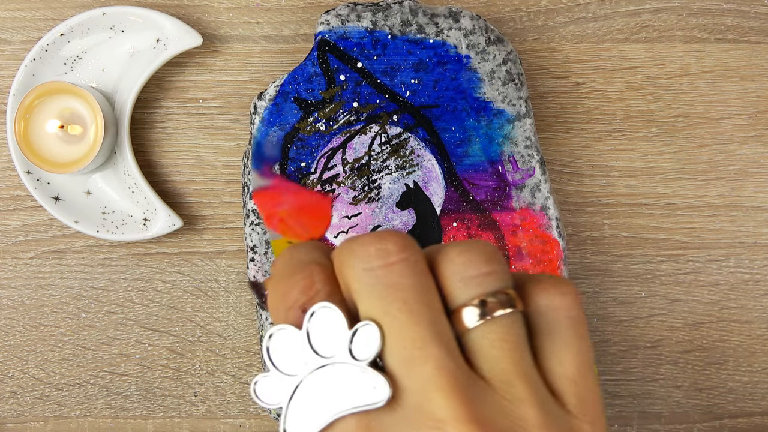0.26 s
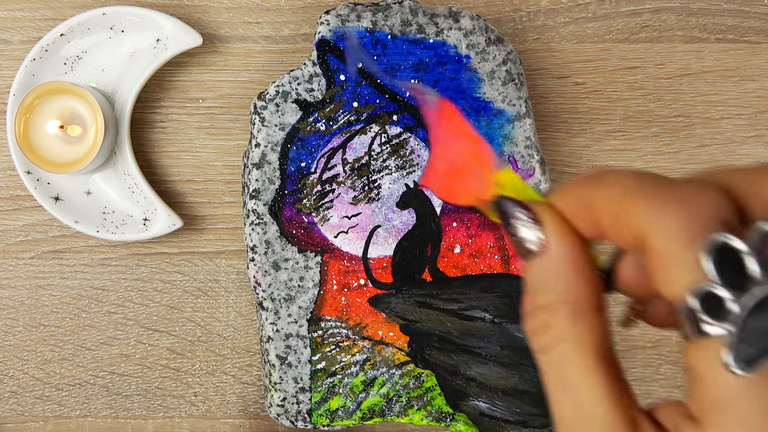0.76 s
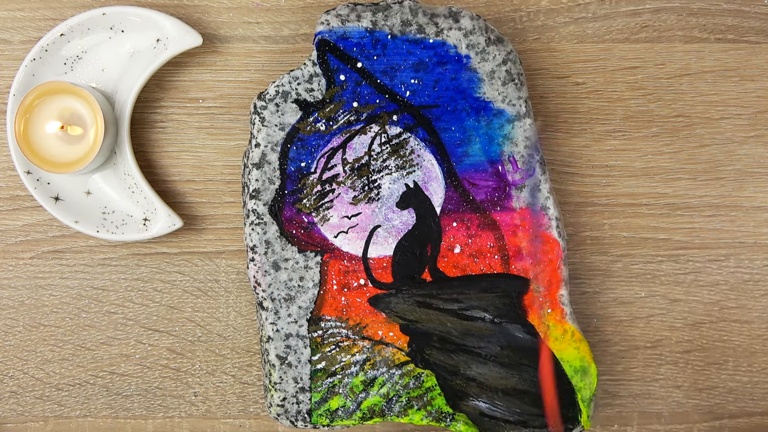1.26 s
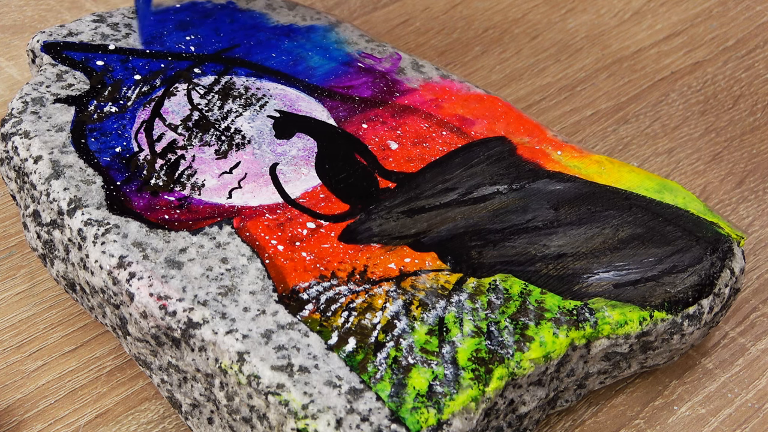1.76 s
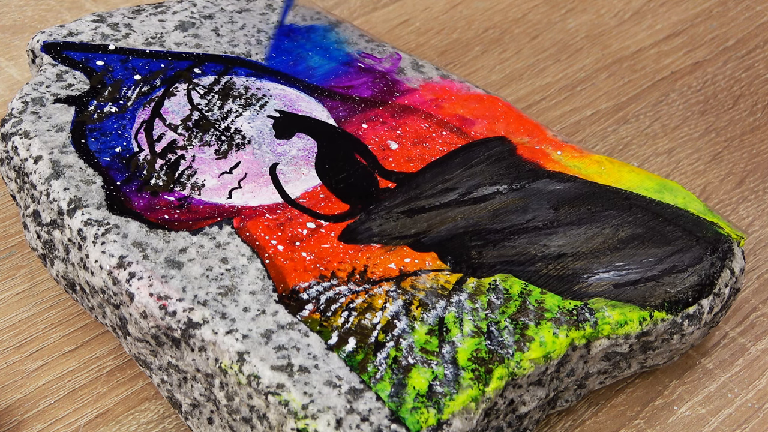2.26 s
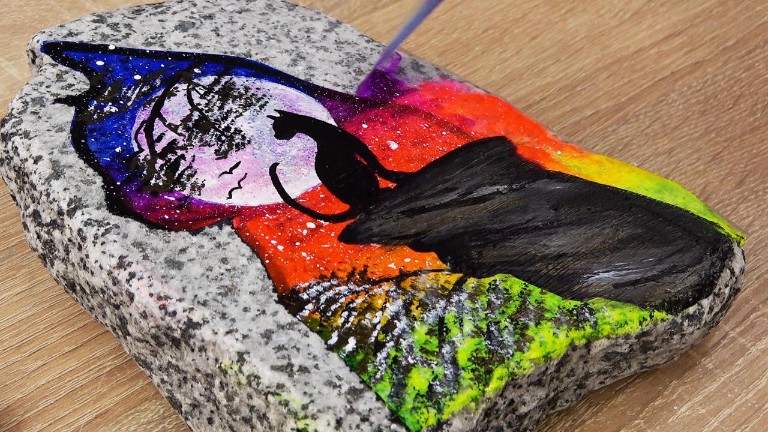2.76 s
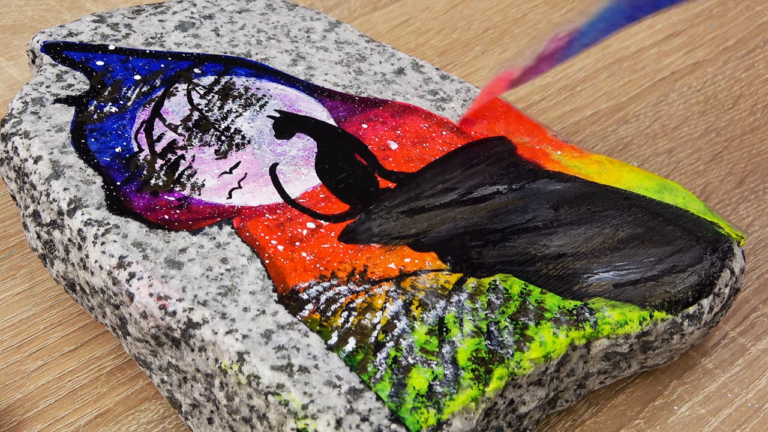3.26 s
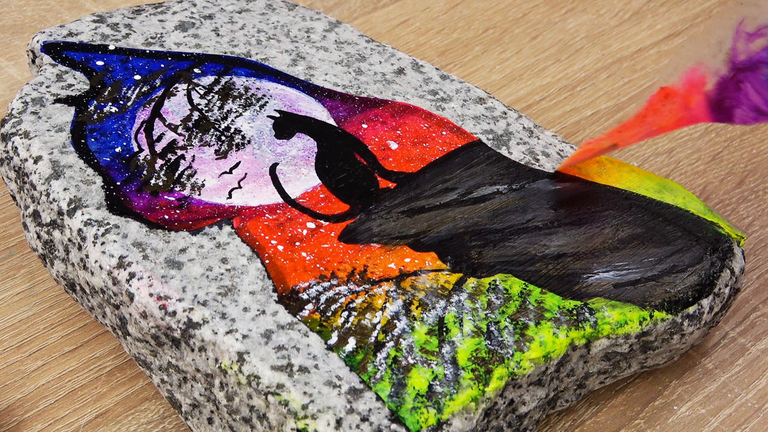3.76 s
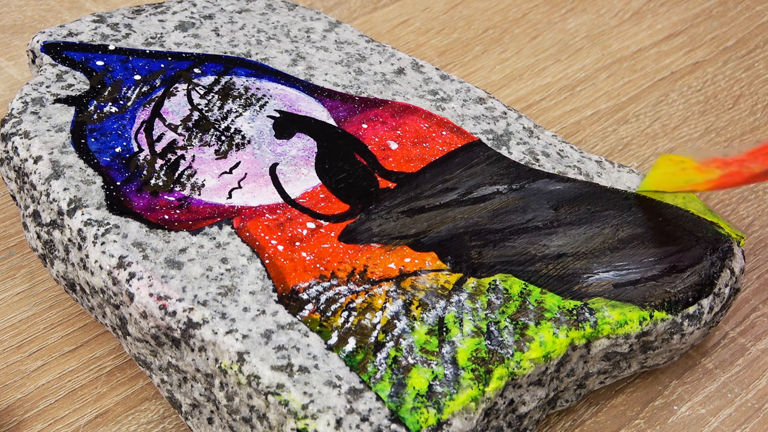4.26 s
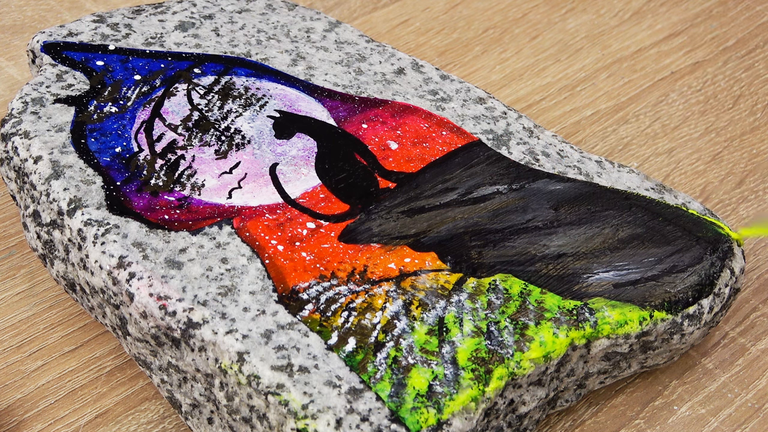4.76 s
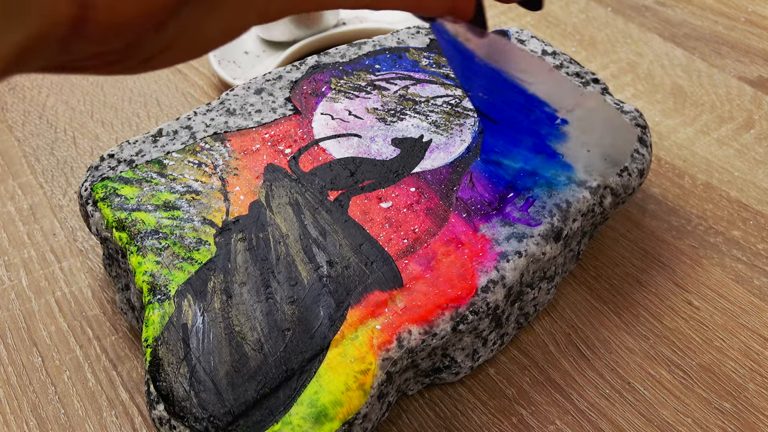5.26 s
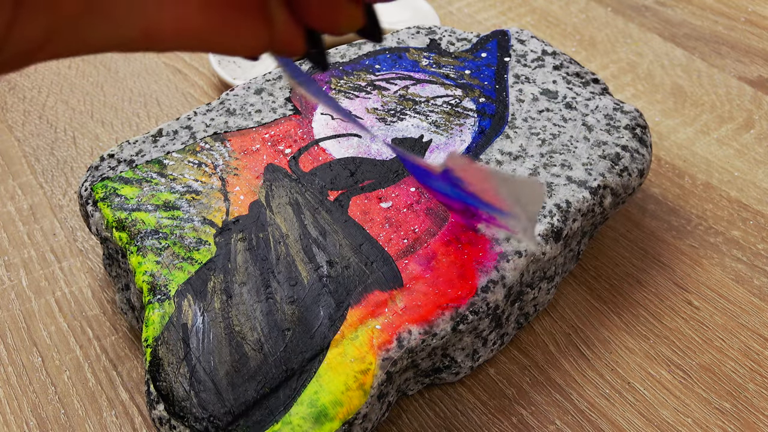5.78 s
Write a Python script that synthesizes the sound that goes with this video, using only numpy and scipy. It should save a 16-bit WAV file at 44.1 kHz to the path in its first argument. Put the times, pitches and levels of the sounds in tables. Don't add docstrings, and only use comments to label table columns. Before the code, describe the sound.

Dry sticky tearing: dense crisp snaps and fine crackle as stiff painted tape is pulled from stone, with quiet gaps between pulls.

```python
import sys
import numpy as np
from scipy import signal
from scipy.fft import rfft, irfft, next_fast_len
from scipy.io import wavfile
from scipy.ndimage import map_coordinates

SR = 44100
rng = np.random.default_rng(int(sys.argv[2]) if len(sys.argv) > 2 else 0)


def transcribe(u):
    v = np.clip(np.atleast_2d(u).T, -1, 1)
    q = np.round(v * 32767).astype(np.int16)
    wavfile.write(sys.argv[1], SR, q)


def decibels_to_gain(level_db):
    exponent = np.asarray(level_db, float) / 20
    return 10 ** exponent


N = 265482

# t/s, wide crack peak level/dB, strongest f/Hz, thin
# cracks level/dB, strip knock level/dB
GLUE_SNAPS = [(0.1953, -17.0, 4500.0, -17.0, -29.0), (0.2121, -3.0, 6400.0, -2.0, -16.0),
              (0.2161, -8.0, 3900.0, -1.0, -47.0), (0.2204, -6.0, 5000.0, -5.0, -23.0),
              (0.2273, -7.0, 3900.0, 1.0, -23.0), (0.238, -15.0, 6400.0, -4.0, -27.0),
              (0.2424, -13.0, 5300.0, -4.0, -25.0), (0.2458, -20.0, 1200.0, -4.0, -26.0),
              (0.2502, -23.0, 5500.0, -4.0, -30.0), (0.254, -24.0, 1100.0, -4.0, -25.0),
              (0.2594, -17.0, 3600.0, -7.0, -27.0), (0.2622, -14.0, 6900.0, -7.0, -23.0),
              (0.2685, -5.0, 7000.0, -4.0, -25.0), (0.2712, -4.0, 5100.0, -2.0, -21.0),
              (0.2771, -9.0, 7000.0, 0.0, -17.0), (0.2819, -5.0, 6900.0, -2.0, -14.0),
              (0.2846, -9.0, 2700.0, -7.0, -33.0), (0.2888, -7.0, 6700.0, -7.0, -21.0),
              (0.2926, -6.0, 6500.0, -6.0, -24.0), (0.2964, -7.0, 4200.0, -7.0, -21.0),
              (0.2988, -13.0, 4700.0, -6.0, -17.0), (0.3012, -9.0, 6400.0, -7.0, -25.0),
              (0.3052, -8.0, 6400.0, -2.0, -19.0), (0.3108, -4.0, 4900.0, -3.0, -18.0),
              (0.3181, -15.0, 6900.0, -6.0, -27.0), (0.3227, -13.0, 7000.0, -4.0, -23.0),
              (0.3312, -16.0, 1800.0, -7.0, -20.0), (0.335, -12.0, 7000.0, -6.0, -21.0),
              (0.3385, -21.0, 1900.0, -7.0, -30.0),
              (0.5922, -27, 7000.0, -13, -32), (0.6007, -21, 5900.0, -9, -31),
             (0.6144, -17, 3600.0, -14, -25), (0.625, -15, 5700.0, -16, -28),
             (0.6308, -16, 5900.0, -10, -29), (0.6341, -10, 3400.0, -5, -20),
             (0.6388, -11, 3800.0, -8, -20), (0.645, -6, 1800.0, -6, -11), (0.6532, -14, 2500.0, -7, -24),
             (0.6563, -11, 2400.0, -3, -26), (0.6607, -19, 2000.0, -7, -22), (0.6658, -17, 1800.0, -7, -20),
             (0.6698, -15, 5400.0, 2, -35), (0.68, -11, 7000.0, -1, -23), (0.685, -19, 5300.0, -12, -31),
             (0.6933, -18, 7000.0, -7, -32), (0.7053, -7, 1400.0, -2, -11), (0.7218, -19, 1700.0, -14, -23),
             (0.7262, -16, 1300, -15, -15), (0.7424, -16, 6400.0, -10, -31), (0.7774, -15, 2200.0, -14, -9),
             (0.7841, -10, 2900.0, -11, -24), (0.7975, -17, 6500.0, -14, -43),
             (0.811, -9, 3800.0, -14, -23), (0.8339, -14, 1600.0, -9, -11), (0.8509, -20, 2300.0, -25, -21),
             (0.882, -13, 6400.0, -1, -16), (0.893, -15, 2300.0, -13, -22), (0.9086, -30, 2000.0, -14, -24),
             (0.9595, -13, 6400.0, -7, -20), (0.9687, -17, 1100.0, -11, -18), (1.0016, -7, 1900.0, 1, -11),
             (1.0114, -8, 1600.0, -9, -9),
              (1.4202, -32, 1700.0, -18, -27), (1.4325, -32, 1250, -26, -25),
              (1.458, -25, 7000.0, -17, -28), (1.4847, -26, 1200.0, -15, -22),
              (1.5125, -6, 3900.0, -2, -17), (1.5937, -20, 3500.0, -21, -35),
              (1.6171, -26, 5200.0, -17, -36), (1.6213, -22, 7000.0, -14, -35),
              (1.6251, -14, 3300.0, -6, -27), (1.647, -18, 1900.0, -12, -18),
              (1.665, -13, 6500.0, -16, -26), (1.6703, -20, 1300, -16, -19),
              (1.6788, -15, 6100.0, -13, -25), (1.6814, -16, 6400.0, -15, -26),
              (1.6899, -16, 3400.0, -21, -30), (1.704, -18, 6600.0, -14, -27),
              (1.7846, -16, 6700.0, -9, -28), (1.8056, -8, 5700.0, -3, -22), (1.8131, -15, 3300.0, -7, -30),
              (1.8245, -10, 3200.0, -7, -36), (1.829, -7, 3200.0, -3, -31), (1.8519, -11, 6200.0, -3, -29),
              (1.8684, -14, 2900.0, -11, -27), (1.8797, -17, 2800.0, -12, -33),
              (1.8854, -14, 7000.0, -7, -27), (1.8946, -13, 5600.0, -11, -21),
              (1.9009, -11, 7000.0, -4, -20), (1.9199, -13, 3200.0, -16, -25),
              (1.9236, -16, 7000.0, -7, -44), (1.9298, -15, 5600.0, -13, -25),
              (1.9655, -15, 2900.0, -11, -22), (1.9693, -16, 5300.0, -18, -39),
              (1.9976, -19, 7000.0, -18, -27), (2.0014, -15, 5300.0, -14, -42),
              (2.0188, -9, 2900.0, -9, -22), (2.0247, -8, 2800.0, -9, -14), (2.0295, -12, 3000.0, -11, -44),
              (2.0836, -11.0, 6400.0, -5.0, -25.0), (2.1233, -8.0, 3700.0, 0.0, -17.0),
              (2.2173, -11.0, 3600.0, -13.0, -33.0), (2.245, -13.0, 2900.0, -11.0, -31.0),
              (2.2635, -16.0, 6800.0, -9.0, -24.0), (2.2676, -9.0, 5700.0, -12.0, -59.0),
              (2.2785, -15.0, 4200.0, -5.0, -29.0), (2.2838, -14.0, 4500.0, -9.0, -29.0),
              (2.2965, -4.0, 7000.0, -4.0, -20.0), (2.3078, -12.0, 7000.0, -11.0, -32.0),
              (2.3256, -10.0, 6500.0, -3.0, -23.0), (2.3415, -11.0, 5800.0, -8.0, -25.0),
              (2.357, -4.0, 5200.0, -6.0, -22.0), (2.3702, -9.0, 4400.0, -7.0, -23.0),
              (2.3761, -7.0, 6600.0, -6.0, -24.0), (2.3894, -11.0, 6700.0, -4.0, -21.0),
              (2.3931, -9.0, 7000.0, -2.0, -24.0), (2.3972, -9.0, 6100.0, -8.0, -25.0),
              (2.4223, -2.0, 5300.0, -2.0, -21.0), (2.4351, -4.0, 5400.0, -6.0, -16.0),
              (2.4384, -10.0, 6600.0, -9.0, -33.0), (2.4556, -6.0, 4200.0, -6.0, -23.0),
              (2.4796, -6.0, 6500.0, -3.0, -27.0), (2.5015, -7.0, 4900.0, -3.0, -26.0),
              (2.509, -9.0, 6100.0, -13.0, -25.0), (2.514, -8.0, 6600.0, -1.0, -26.0),
              (2.5185, -3.0, 6000.0, -4.0, -17.0), (2.559, -3.0, 6100.0, -3.0, -16.0),
              (2.5808, -15.0, 6000.0, -9.0, -31.0), (2.5966, -10.0, 4900.0, -8.0, -29.0),
              (2.6417, -11.0, 2300.0, -5.0, -13.0), (2.6648, -3.0, 6100.0, -5.0, -21.0),
              (2.6782, -6.0, 5400.0, -5.0, -19.0), (2.6807, -5.0, 5300.0, -6.0, -16.0),
              (2.6879, -5.0, 6200.0, -2.0, -18.0), (2.6933, -3.0, 6300.0, -2.0, -22.0),
              (2.7016, -2.0, 6100.0, -8.0, -15.0), (2.7106, -10.0, 7000.0, -3.0, -19.0),
              (2.7277, -3.0, 6100.0, -6.0, -20.0), (2.7364, -7.0, 4700.0, -4.0, -16.0),
              (2.7627, -5.0, 6200.0, -7.0, -22.0), (2.766, -4.0, 6800.0, 0.0, -18.0),
              (2.7776, -6.0, 4000.0, -4.0, -17.0), (2.8086, -2.0, 5000.0, -6.0, -19.0),
              (2.8235, -7.0, 4100.0, -10.0, -20.0), (2.8383, -5.0, 5200.0, -9.0, -20.0),
              (2.8708, -1.0, 6300.0, -6.0, -24.0), (2.8815, -6.0, 4000.0, -14.0, -18.0),
              (2.8861, -6.0, 5700.0, -6.0, -26.0), (2.9126, -10.0, 5600.0, -3.0, -26.0),
              (2.921, -4.0, 4700.0, -5.0, -22.0), (2.9266, -4.0, 4700.0, -4.0, -20.0),
              (2.9519, -4.0, 5000.0, -3.0, -23.0), (2.9621, -2.0, 5700.0, -6.0, -26.0),
              (2.9726, -6.0, 6300.0, -3.0, -16.0), (2.9971, -4.0, 3900.0, -3.0, -15.0),
              (3.0041, -1.0, 5700.0, -5.0, -18.0), (3.0196, -3.0, 5400.0, -3.0, -16.0),
              (3.0326, -7.0, 2400.0, -2.0, -14.0), (3.051, -11.0, 5200.0, -5.0, -32.0),
              (3.0706, -4.0, 5300.0, -4.0, -17.0), (3.0755, -5.0, 6400.0, -2.0, -24.0),
              (3.0852, -6.0, 5200.0, -9.0, -13.0), (3.114, -9.0, 7000.0, -2.0, -16.0),
              (3.1659, -10.0, 6300.0, -8.0, -24.0), (3.1739, -7.0, 5700.0, -6.0, -21.0),
              (3.1769, -10.0, 5300.0, -2.0, -24.0), (3.2109, -13.0, 5800.0, -6.0, -27.0),
              (3.2204, -8.0, 2900.0, -4.0, -22.0), (3.2325, -4.0, 5900.0, -3.0, -21.0),
              (3.2833, -5.0, 6700.0, -2.0, -23.0), (3.2941, -4.0, 5900.0, -4.0, -19.0),
              (3.3168, -16.0, 6000.0, -8.0, -27.0), (3.3412, -6.0, 5300.0, -3.0, -24.0),
              (3.359, -12.0, 7000.0, -4.0, -23.0), (3.3735, -7.0, 5400.0, -4.0, -17.0),
              (3.4004, -10.0, 7000.0, -5.0, -24.0), (3.4311, -4.0, 5500.0, -3.0, -19.0),
              (3.4385, -8.0, 6800.0, -4.0, -23.0), (3.4531, -6.0, 5500.0, -2.0, -23.0),
              (3.4634, -10.0, 7000.0, -2.0, -25.0), (3.4667, -16.0, 7000.0, 0.0, -49.0),
              (3.5022, -5.0, 6800.0, -3.0, -18.0), (3.5059, -12.0, 5200.0, -7.0, -19.0),
              (3.532, -7.0, 6700.0, -2.0, -16.0), (3.5468, -12.0, 3300.0, -3.0, -21.0),
              (3.5609, -6.0, 5400.0, -8.0, -27.0), (3.578, -3.0, 6700.0, 0.0, -16.0),
              (3.5901, -8.0, 5300.0, -6.0, -21.0), (3.5954, -14.0, 7000.0, -2.0, -27.0),
              (3.6207, -11.0, 5300.0, -8.0, -23.0), (3.6315, -11.0, 6700.0, -4.0, -25.0),
              (3.6569, -9.0, 6300.0, -2.0, -18.0), (3.6779, -13.0, 5800.0, -8.0, -41.0),
              (3.6859, -7.0, 6800.0, -1.0, -19.0), (3.7078, -7.0, 5300.0, -11.0, -22.0),
              (3.7361, -27, 3900.0, -26, -34), (3.7916, -30, 6700.0, -22, -46),
             (3.796, -21, 3100.0, -24, -36), (3.8379, -7, 6500.0, -2, -24), (3.8423, -26, 6700.0, -18, -47),
             (3.9532, -29, 4700.0, -24, -47), (3.9715, -24, 7000.0, -15, -38),
             (3.9763, -24, 3600.0, -22, -39), (4.0046, -21, 5500.0, -16, -39),
             (4.016, -24, 7000.0, -16, -41), (4.0358, -22, 3300.0, -18, -33), (4.0527, -16, 950, -11, -24),
             (4.0742, -21, 5400.0, -29, -32), (4.0873, -23, 4900.0, -18, -36),
             (4.2365, -48, 6900.0, -32, -52), (4.2585, -28, 2900.0, -40, -37),
             (4.2659, -18, 3000.0, -24, -32), (4.3144, -27, 950, -17, -30), (4.3278, -25, 7000.0, -10, -42),
             (4.3508, -19, 2900.0, -21, -35), (4.3678, -37, 2500.0, -29, -50),
             (4.3945, -19, 2500.0, -20, -29), (4.4022, -18, 7000.0, -10, -37),
             (4.4215, -25, 3100.0, -34, -31), (4.4518, -22, 3000.0, -30, -32),
             (4.4669, -23, 3100.0, -31, -34), (4.551, -26, 3000.0, -52, -43),
             (4.5834, -29, 3100.0, -30, -35), (4.8276, -26, 2900.0, -36, -33),
             (4.8324, -22, 5400.0, -23, -36), (4.8758, -28, 3600.0, -37, -50)]
# t/s, peak level/dB
LESSER_SNAPS = [(0.2233, -7), (0.2307, -6), (0.2648, -6), (0.3498, -10), (0.3547, -7), (2.1, -11),
                (2.1653, -8), (2.1793, -10), (2.194, -9), (2.2515, -9), (2.2546, -8), (2.261, -8),
                (2.2935, -7), (2.3628, -8), (2.3856, -6), (2.4006, -9), (2.4299, -7), (2.499, -8),
                (2.6258, -3), (2.6687, -4), (2.7202, -5), (2.7307, -5), (2.7449, -5), (2.7468, -5),
                (2.7545, -7), (2.7606, -7), (2.7964, -6), (2.8281, -4), (2.8302, -4), (2.8335, -3),
                (2.8631, -8), (2.8684, -6), (2.898, -4), (2.9006, -4), (2.9365, -5), (3.0163, -7),
                (3.0414, -8), (3.1405, -10), (3.1549, -8), (3.2061, -6), (3.2655, -10), (3.2741, -6),
                (3.2873, -5), (3.3694, -4), (3.3906, -5), (3.4082, -8), (3.4232, -6), (3.5991, -6),
                (3.6924, -7)]
# t/s, peak level/dB
JOLTS = [(0.282, -29), (0.334, -21.5), (0.643, -29), (0.705, -26), (0.726, -29.5), (1.011, -26),
         (2.122, -24.5), (2.162, -32), (2.434, -31), (3.232, -21.5), (3.53, -19.5), (3.837, -42),
         (4.051, -49), (4.265, -39), (4.314, -36)]
# start of full force t/s, held/s, rise/s, fine crackle level/dB, flap level/dB
PULLS = [(0, 0.017, .01, -43.5, -47.5), (0.061, 0.15, 0.027, -51, -59.5), (0.212, 0.14, 0.023, -20.5, -37),
         (0.639, 0.1, 0.077, -22, -37), (0.741, 0.21, 0.044, -34.5, -41.5), (.92, 0.17, 0.034, -41, -56),
         (1.427, 0.22, 0.032, -38.5, -56.5), (1.657, 0.043, 0.22, -30, -51), (1.821, 0.2, 0.083, -24, -44),
         (2.017, 0.0069, 0.011, -21.5, -44), (2.052, 0.25, 0.032, -34.5, -43),
         (2.269, 0.26, 0.24, -29.5, -40), (2.53, .12, .02, -45.5, -47.5), (2.672, 0.46, 0.079, -29, -41.5),
         (3.003, 0.63, 0.054, -34, -43), (3.749, 0.42, .05, -48, -66), (4.253, 0.22, 0.013, -46.5, -67.5),
         (4.818, 0.028, 0.056, -42.5, -67)]
# t/s, f/Hz
FLAP_PITCH = [(0, 260), (0.7, 219.5), (0.832, 99.6), (1.5, 220.7), (2.05, 250), (2.14, 400), (2.329, 200),
              (2.778, 119.6), (3.12, 109), (3.398, 179), (4.9, 150)]
# f/Hz, level/dB per Hz
CRACKLE_COLOUR = [(300, -38.5), (950, 10), (1800, -2), (6000, 3), (12000, 2.5), (16000, -15)]
# f/Hz, level/dB per Hz
FLAP_COLOUR = [(20, -15.5), (50, -13.5), (120, -7.5), (280, -8), (480, -15), (1600, -29)]
# f/Hz, level/dB per Hz
HUSH_COLOUR = [(20, -6.5), (43, -9.5), (190, -19.5), (950, -26.5), (16000, -41.5)]
# f/Hz, width/Hz, level/dB
STRIP_MODES = [(1220, 75, 4.5), (1915, 120, 4)]
# f/Hz, time to fall 60 dB/s
WALL_DECAY = [(200, 0.42), (1500, 0.37), (5000, 0.37), (14000, 0.22)]
# delay t/s, level/dB
TABLE_ECHO = [(.0045, -16)]
# its first playing t/s, its second playing t/s
REPEAT = (2.095, 4.915)
CUTS = (.174, 1.413, 4.913)

DULL_HZ, THUD_SPREAD_DB = 2450, 3
THIN_DB = 5
RISE_DB, JERK_S = 26.5, 0.039
CRACKLE_FALL_DB_PER_S, FLAP_FALL_DB_PER_S = 257, 191.5
REST_DB = -78


def unit(x):
    return x / np.sqrt(np.mean(x ** 2) + 1e-20)


def along(points, hz):
    f, v = np.transpose(points)
    return np.interp(np.log(hz + 1), np.log(f + 1), v)


def filtered(x, response):
    m = next_fast_len(N + SR // 2)
    return irfft(rfft(x, m) * response(np.fft.rfftfreq(m, 1 / SR)), m)[:N]


def coloured(x, spectrum):
    return unit(filtered(x, lambda hz: decibels_to_gain(along(spectrum, hz))))


def wobble(rate):
    return map_coordinates(rng.standard_normal(int(N * rate / SR) + 4), [np.arange(N) * rate / SR])


def pings(s, hz, gain, cycles, size=128):
    start = np.floor(s * SR).astype(int)
    places = start[:, None] + np.arange(size)
    turns = hz[:, None] * np.clip(places / SR - s[:, None], 0, None)
    wave = gain[:, None] * np.sin(2 * np.pi * turns) * np.exp((.25 - turns) / cycles)
    return np.bincount(places.ravel(), wave.ravel(), N + SR)[:N]


def blows(s, gain):
    return np.bincount((s * SR).astype(int), gain, N)


def hush():
    return decibels_to_gain(-64.0) * coloured(rng.standard_normal(N), HUSH_COLOUR)


def wall_tail():
    hz, t, z = signal.stft(rng.standard_normal(SR // 2), SR, nperseg=128)
    decay = decibels_to_gain(-60 * t / along(WALL_DECAY, hz)[:, None])
    tail = signal.istft(z * decay, SR, nperseg=128)[1]
    scatter = rng.standard_normal(len(tail)) * decibels_to_gain(-60 * np.arange(len(tail)) / SR / 0.018)
    return tail / np.linalg.norm(tail) + 1.3 * scatter / np.linalg.norm(scatter)


def room(x):
    near = sum(decibels_to_gain(db) * np.roll(x, round(s * SR)) for s, db in TABLE_ECHO)
    far, hop = np.zeros(N + SR), SR // 12
    for i in range(0, N, hop):
        wet = signal.fftconvolve(x[i:i + hop], wall_tail())
        far[i + 20:][:len(wet)] += wet
    return near + filtered(far[:N], lambda f: decibels_to_gain(-14.0 + 0.05 * np.log2(f / 4000 + 0.0083)))


def force(column, fall_db_per_s, jerk_db=0):
    t, out = np.arange(N) / SR, np.full(N, float(REST_DB))
    for row in PULLS:
        s, held, rise = row[:3]
        early = np.clip(s - t, 0, None)
        late = np.clip(t - s - held, 0, None)
        jerk = jerk_db * np.exp(-np.clip(t - s, 0, None) / JERK_S)
        level = row[column] + jerk - RISE_DB * early / max(rise, .004) - fall_db_per_s * late
        out = np.maximum(out, level)
    return out


def flap_db():
    return force(column=4, fall_db_per_s=FLAP_FALL_DB_PER_S, jerk_db=5.0)


def flap():
    s, hz = np.transpose(FLAP_PITCH)
    t = np.arange(N) / SR
    phase = 2 * np.pi * np.cumsum(np.interp(t, s, hz)) / SR
    flutter = unit(wobble(130) * np.cos(phase) + wobble(130) * np.sin(phase))
    rumble = coloured(rng.standard_normal(N), FLAP_COLOUR)
    return decibels_to_gain(flap_db() + 1.5 * wobble(13) - 2) * (.8 * flutter + rumble)


def strip_modes(f):
    return sum((-1) ** k * decibels_to_gain(db) * 1j * f * width / (centre * centre - f * f + 1j * f * width)
               for k, (centre, width, db) in enumerate(STRIP_MODES))


def thin_edge(f, hz=900):
    return (1j * f / (hz + 1j * f)) ** 3


def crackle():
    effort_db = force(column=3, fall_db_per_s=CRACKLE_FALL_DB_PER_S)
    when, pitch, size = rng.random((1800, 3)).T
    hz = 1500 * 9 ** pitch
    sign = np.sign(np.sin(99 * size))
    gain = decibels_to_gain(along(CRACKLE_COLOUR, hz) - 26 * np.sqrt(size)) * sign
    ticks = unit(decibels_to_gain(3 * wobble(70)) * pings(when * N / SR, hz, gain * np.sqrt(hz), cycles=.5))
    ticks = unit(filtered(ticks, lambda f: thin_edge(f) * (1 + decibels_to_gain(0.5) * strip_modes(f))))
    rustle = unit(decibels_to_gain(4 * wobble(78)) * coloured(rng.standard_normal(N), CRACKLE_COLOUR))
    share = np.clip((effort_db + 61) / 25, .3, .93)
    return decibels_to_gain(effort_db - 4.5) * (np.sqrt(share) * ticks + np.sqrt(1 - share) * rustle)


def lesser_snaps():
    s, db = np.transpose(LESSER_SNAPS)
    pitch, balance, knock = rng.standard_normal((60, 3))[:len(s)].T
    hz = np.clip(5200 * np.exp(.25 * pitch), 2600, 7000)
    return np.transpose([s, db - 6 + 2 * balance, hz, db - 4 - 2 * balance, db - 20 + 3 * knock])


def wide_cracks(s, db, hz, sign, vary, after):
    follow_s = s + 0.000388 + 0.0005 * after
    follow_hz = 0.86 * hz * np.exp(0.23 * vary)
    db = db + 0.5 * np.clip(db + 10.0, 0, None)
    first = pings(s, hz, sign * decibels_to_gain(db), cycles=1.58)
    return first + pings(follow_s, follow_hz, sign * decibels_to_gain(db - 3), cycles=0.4)


def thin_cracks(s, db, chance):
    out = np.zeros(N)
    for k in (1, 2, 3):
        late, pitch, size = chance[:, k].T
        hz = np.clip(np.where(s < CUTS[1], 9300, 8200) * np.exp(.17 * pitch), 6800, 12500)
        gain = np.sign(size) * decibels_to_gain(db + THIN_DB - 1.4 * k - 1.1 * abs(size))
        out += pings(s + 0.0003 * (k - 1.5) * abs(late), hz, gain, cycles=.8)
    return out


def thuds(s, knock_db, sign, spread):
    swing = decibels_to_gain(0.81 * flap_db() + 51)
    hits = blows(s, sign * decibels_to_gain(knock_db + THUD_SPREAD_DB * spread)) * swing
    jolt_s, jolt_db = np.transpose(JOLTS)
    hits += blows(jolt_s, decibels_to_gain(jolt_db + 31.5))
    return filtered(hits, lambda f: (1j * f * 600 / (600 ** 2 - f * f + 1j * f * 600)) ** 2)


def snaps():
    rows = [*GLUE_SNAPS,
            *lesser_snaps()]
    s, wide_db, hz, thin_db, knock_db = np.transpose(rows)
    chance = rng.standard_normal((400, 4, 3))[:len(s)]
    sign, vary, after = np.sign(chance[:, 0, 0]), chance[:, 0, 1], abs(chance[:, 0, 2])
    dull = hz < DULL_HZ
    wide_hz = np.where(dull, 3600 * np.exp(.15 * vary), hz)
    cracks = wide_cracks(s, wide_db, wide_hz, sign, vary, after) + thin_cracks(s, thin_db, chance)
    ring = pings(s, hz, dull * sign * decibels_to_gain(knock_db + 5.5), cycles=1.4, size=400)
    knocks = filtered(blows(s, sign * decibels_to_gain(knock_db + 27.5 - 24 * dull)), strip_modes)
    return filtered(cracks + ring + knocks, thin_edge) + thuds(s, knock_db, sign, chance[:, 1, 2])


def scene():
    strip = snaps() + crackle()
    return (strip + room(strip) + flap() + hush())[None]


def low_pass(x):
    return signal.sosfilt(signal.butter(12, 16000, fs=SR, output="sos"), x)


def record(dry):
    x = dry / (1 + np.abs(dry) ** 8) ** (1 / 8)
    source, cut = (round(s * SR) for s in REPEAT)
    x = np.concatenate([x[:, :cut], x[:, source:source + N - cut]], axis=1)
    for s in CUTS:
        x = x * np.clip(np.abs(np.arange(N) / SR - s) / .004, 0, 1)
    return low_pass(x)


dry = scene()
out = record(dry)
transcribe(out)
```